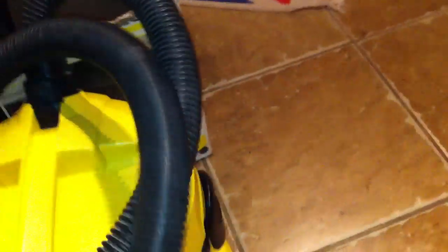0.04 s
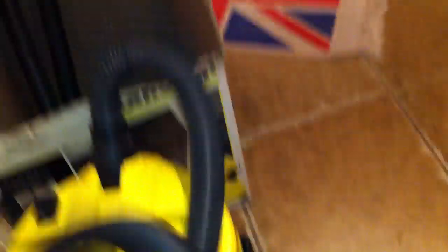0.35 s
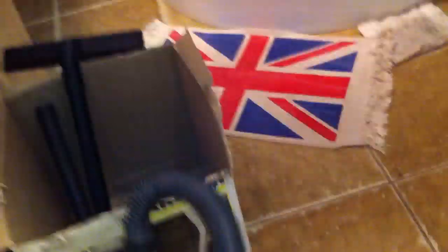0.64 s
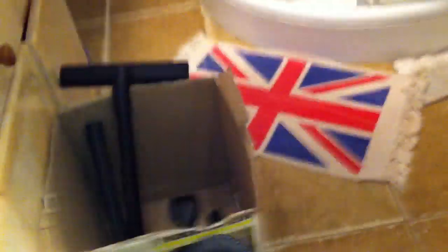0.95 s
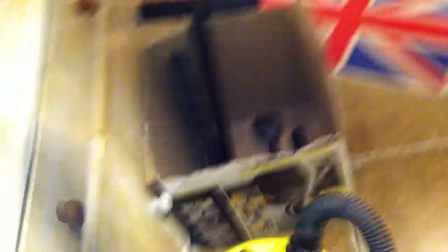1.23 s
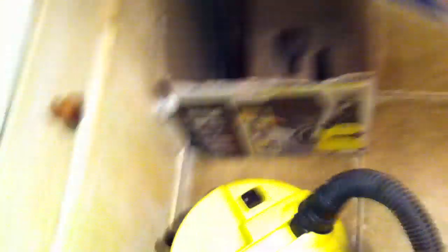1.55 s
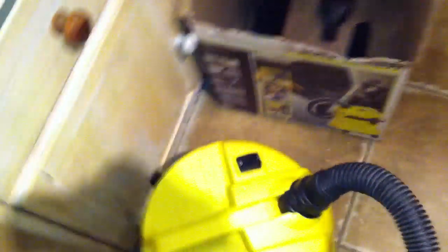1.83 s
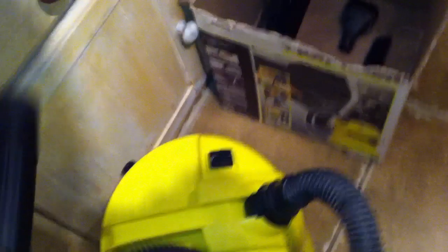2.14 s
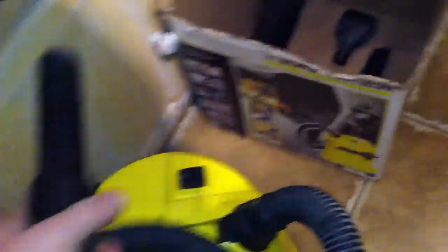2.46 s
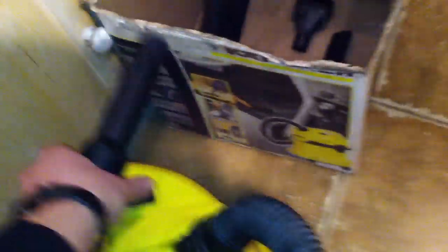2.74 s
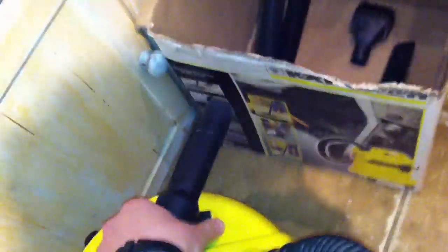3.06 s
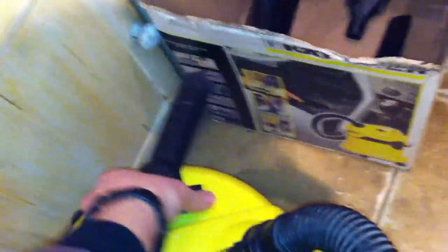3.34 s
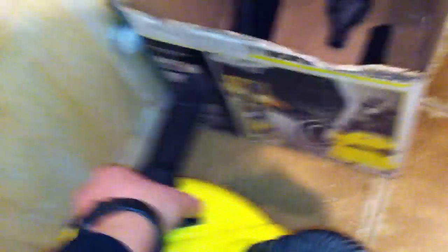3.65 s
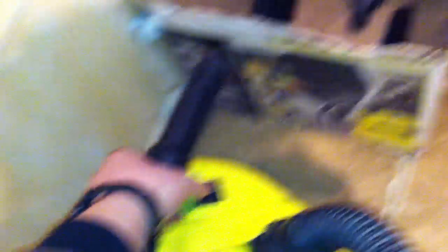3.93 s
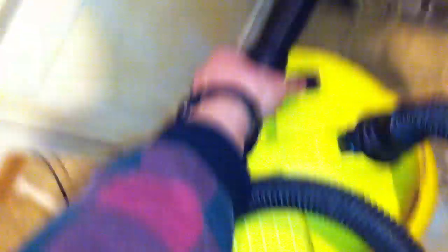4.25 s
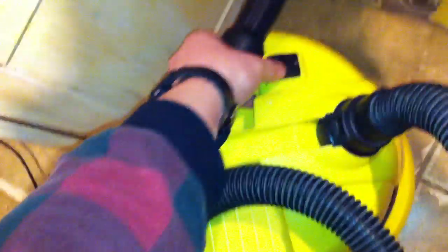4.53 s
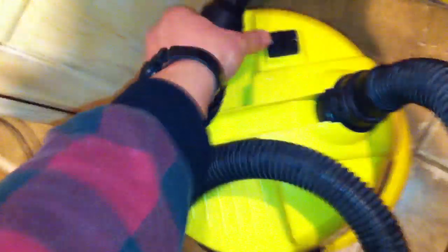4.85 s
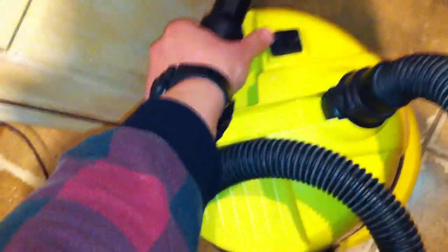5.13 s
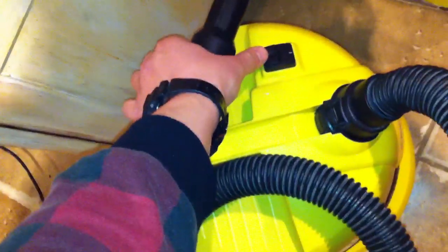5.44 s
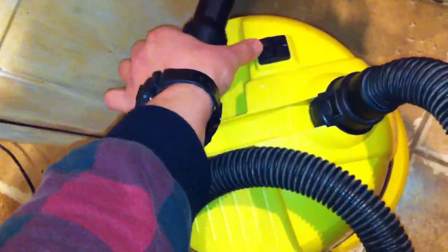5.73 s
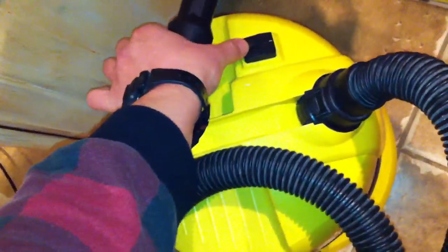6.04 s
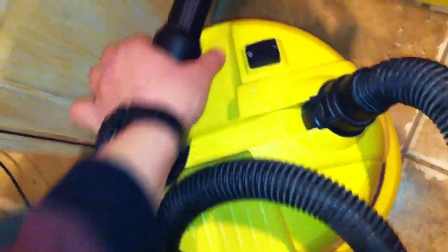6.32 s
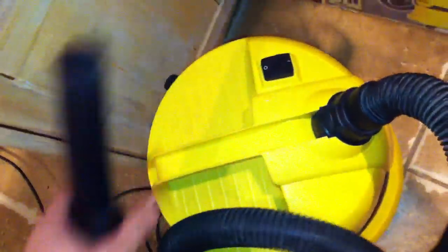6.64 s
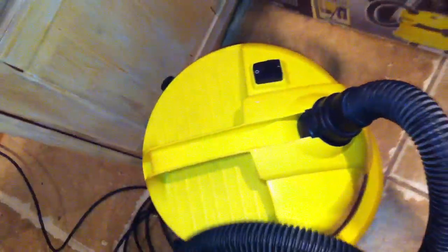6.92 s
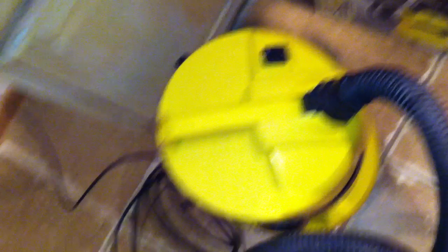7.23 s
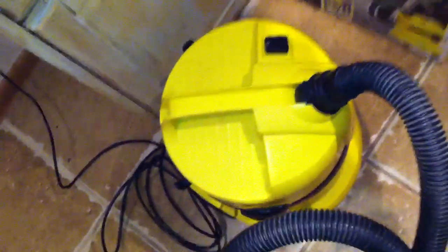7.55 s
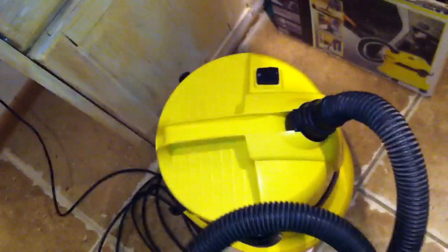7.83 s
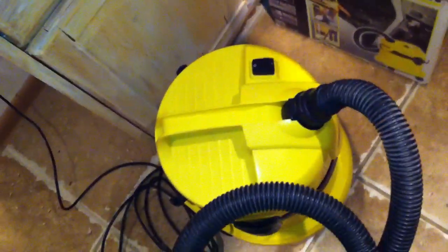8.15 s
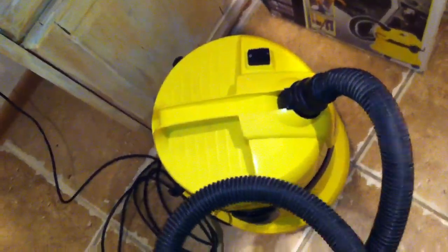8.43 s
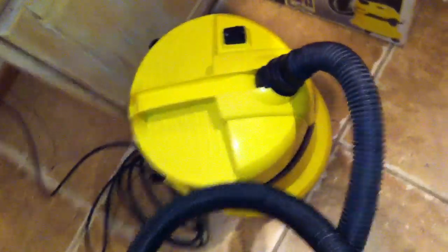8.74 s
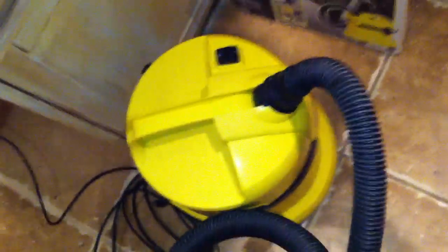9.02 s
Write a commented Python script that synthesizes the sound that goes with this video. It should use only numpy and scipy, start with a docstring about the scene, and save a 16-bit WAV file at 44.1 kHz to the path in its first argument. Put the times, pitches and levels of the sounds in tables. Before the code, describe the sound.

A tub vacuum cleaner is handled close to the microphone in a small tiled room with a short echo. In the first second its ribbed hose and plastic wand make a cluster of hollow knocks and scrapes, strongest around 0.5 seconds. Lighter bumps and faint rubbing follow, then more knocks from about 2.2 to 3 seconds, with a sharp, ringing tap of the wand near 2.8. At 3.6 seconds the switch snaps and the motor starts with a jolt, rising within about half a second to a loud, steady howl with a high whine and rushing, hissing air. At about 6 seconds the power cuts. The pitch glides down, quickly at first and then more slowly, while the hiss fades into a scraping whirr. The tub rumbles and booms as the motor slows, still coasting at the end, around 9 seconds.

```python
"""A small, hard room with a tiled floor, the microphone within a few steps of a tub vacuum cleaner.
Its ribbed hose and plastic wand drag and knock, then the switch clicks. The motor spins up, howls at
its shaft rate with a ball bearing singing beside it, and coasts down when cut.
Air rushes through the fan, the tub rumbles, and the room answers."""
import sys
import numpy as np
from scipy import signal
from scipy.fft import rfft, irfft, next_fast_len
from scipy.io import wavfile
from scipy.ndimage import uniform_filter1d, map_coordinates

SR = 44100
rng = np.random.default_rng(int(sys.argv[2]) if len(sys.argv) > 2 else 0)


def unload_audio(sound):
    """Save the sound as a 16-bit wav file, at the path given as the first command line argument."""
    columns = np.transpose(np.atleast_2d(sound))
    # keep every value between -1 and 1, then stretch to whole-number steps
    steps = np.round(np.clip(columns, -1, 1) * 32767)
    wavfile.write(sys.argv[1], SR, steps.astype(np.int16))


N = 400428

# the room's reverberation: (frequency [Hz], t60 [s])
ROOM_DECAY = [(150, 0.5), (600, 0.51), (2500, 0.43), (8000, 0.36), (16000, 0.051)]
# spectra of the room tone and the handling: (frequency [Hz], relative level [dB])
ROOM_TONE = [(30, -28), (120, -27), (240, 5.5), (350, -4.5), (600, -15), (1100, -9), (2000, -22),
             (5000, -23), (17000, -23)]
HOLLOW_TUB = [(40, -31), (90, -19), (125, -10), (165, -11.5), (250, 4), (300, 2), (345, 2), (400, 0),
              (480, 0), (610, 1), (700, -4), (790, -4.5), (950, -12), (1300, -16), (2500, -72)]
STIFF_PLASTIC = [(500, -36), (1000, 3.5), (1500, 4.5), (2200, 4.5), (3200, -1.5), (5000, -14.5),
                 (8000, -26), (16000, -47)]
BRIGHT_TICK = [(2000, -14), (4000, 0), (5700, -1.5), (8000, -1.5), (10000, -6.5), (14000, -8), (17000, -16)]
CONTACT_PUSH = [(60, -42), (180, -1), (500, 3), (900, 0), (2000, -2), (3500, -8), (6000, -18), (12000, -42)]
SLEEVE_CLOTH = [(1000, -22), (3000, 1), (6000, 2), (9000, 1), (13000, -3), (17000, -2)]
SWITCH_SNAP = [(300, -7), (900, 0), (2500, -1), (4500, -3), (6300, 4), (7300, -4), (8000, -14), (10000, -8),
               (17000, -18)]
# spectra of the machine's noises: (frequency [Hz], relative level [dB])
TUB_RUMBLE = [(25, -26), (70, -44), (125, -36), (165, -23), (205, -3), (245, 6), (285, 0), (390, 1),
              (490, -6), (650, 0), (850, -7), (1300, -9.5), (2500, -60.5)]
TUB_BOOM = [(25, -28), (70, -31), (112, -25.5), (136, -10), (156, 6), (182, -5), (260, -3.5), (600, -91)]
AIR_RUSH = [(150, -35), (300, 1.5), (600, -1.5), (1000, 2), (1500, 3), (2000, 1), (2600, 2), (3300, -1),
            (4500, -15.5), (7000, -26), (12000, -56)]
AIR_HISS = [(2000, -24), (3500, 2), (5300, 0), (6500, -2), (8000, -4), (10000, -7.5), (12500, -8),
            (15000, -7), (17300, -14)]
BRUSH_SCRAPE = [(300, -25.5), (700, -1.5), (1100, -2), (1500, 2.5), (1800, -2.5), (2300, -6), (2900, -9.5),
                (3800, -27), (5000, -30), (9000, -17.5), (15000, -30)]

# a sleeve brushes the hose: (time [s], half length [s], level [dB])
SLEEVE_STROKES = [(.57, .04, -45), (1.41, .04, -53), (1.62, 0.055, -62), (1.977, 0.052, -56),
                  (2.23, .03, -52), (2.515, 0.091, -52), (2.8, 0.026, -51)]
# pulls on the hose: (time [s], rise [s], tub [dB], scrape [dB], swish [dB], boom [dB])
HOSE_PULLS = [(.01, 0.2, -55, -56, -57.5, -70), (0.276, 0.072, -50, -52, -59, -53),
              (0.46, 0.031, -28, -35.5, -41, -28), (0.574, 0.021, -34, -47, -52, -32),
              (0.89, 0.091, -52, -50, -53, -43), (1.12, 0.21, -53, -54.5, -55.5, -54),
              (1.414, 0.064, -41, -48, -55, -41.5), (1.61, 0.076, -51, -54, -57, -43.5),
              (1.953, .12, -63, -64.5, -64, -62), (2.246, 0.067, -58, -55.5, -55, -52),
              (2.558, 0.079, -47.5, -52, -55, -51), (2.73, 0.062, -56, -54, -58, -59),
              (2.87, 0.046, -36, -49, -50.5, -52), (3.064, 0.025, -39, -54, -63, -52),
              (3.543, 0.11, -54, -57.5, -69, -71)]
# the hose's slide after a knock, relative to it: (tub [dB], scrape [dB], swish [dB], boom [dB])
HOSE_SETTLE = [-20.5, -26, -27.5, -33]
# soft nudges on the tub: (time [s], level [dB], mode [Hz])
TUB_BUMPS = [(1.32, -34, 224), (2.254, -34.5, 290), (8.815, -31, 247)]
# plastic contacts: (time [s], level [dB], relative thump [dB], relative tick [dB], favoured mode [Hz])
PLASTIC_KNOCKS = [(0.059, -27.5, -2.5, -16, 760), (0.201, -33, -29, -14, 600),
                  (0.307, -15.5, -5, -18.5, 790), (0.324, -15.5, -21, -17.5, 790),
                  (0.404, -17.5, -8, -22, 600), (0.452, -15, -11, -19, 760), (0.520, -12, -12, -19.5, 450),
                  (0.569, -18, -14, -24, 600), (0.579, -17.5, -30, -16, 300), (0.729, -17.5, -15, -23, 740),
                  (0.947, -18, -14, -23, 620), (1.29, -29, -11, -24, 240), (1.366, -28.5, -2.5, -25, 450),
                  (1.573, -26.5, -17, -8, 744), (1.899, -47, -7, -15, 300), (2.249, -25.5, -14.5, -22, 750),
                  (2.519, -25, -8, -23, 250), (2.602, -31, -3.5, -24, 590), (2.634, -18, -9.5, -22.5, 600),
                  (2.654, -29, -4.5, -24, 600), (3.025, -37, -1, -20, 380), (3.047, -27, -6.5, -19, 790),
                  (3.307, -43.5, -4.5, -27, 600)]
# clicks of cuff, wand and switch: (time [s], level [dB])
CUFF_PINGS = [(0.060, -38.5), (1.574, -38)]
WAND_TAPS = [(2.848, -17), (3.434, -39.5), (3.527, -35)]
SWITCH_CLICKS = [(3.613, -12)]
# modes of the struck parts: (frequency [Hz], level [dB], t60 [s])
CUFF_MODES = [(5600, 1, 0.074), (5720, -2, 0.073), (5860, -1, .06), (6800, -15, .12)]
WAND_MODES = [(1610, -2, 0.21), (1640, -1, .18), (1820, 4.5, 0.16), (2000, -10, .14), (2340, 8, 0.077),
              (2440, -2, .16), (3000, -2, 0.097), (4580, -10, .1), (6850, -22, .08)]
TUB_RING = [(245, -3, 0.41), (296, -7, 0.3), (369, -4, 0.18), (475, -2, 0.14), (587, 4.5, 0.1),
            (642, 0.5, 0.16), (740, -4.5, 0.15), (791, -2.5, 0.19)]

# resonances that the motor drives: (frequency [Hz], level [dB], t60 [s], polarity [+/-1])
CORNER_MODES = [(240.3, -3.5, .56, 1), (248.1, 3.8, .31, 1), (249.5, -.2, .11, -1), (263.1, -3.3, .15, 1),
                (267.1, -5.6, .34, -1), (315.8, -8.2, .37, -1), (343.8, -7.1, .3, -1), (362, -9, .19, -1),
                (382, -4.6, .13, -1), (422, -17, .06, -1), (498, -11, .22, 1), (521.6, -14.5, .34, 1),
                (536.2, -16.2, .37, 1), (568.2, -5.8, .09, 1)]  # standing waves in the corner where the machine stands
HOUSING_MODES = [(1190, 0.5, 0.29, 1), (1451, 5, 0.24, 1), (1527.5, 5.5, 0.41, 1)]
VENT_MODES = [(5300, 2, .007, 1), (6250, 0, .005, 1)]
SHELL_MODES = [(1500, 9, .035, 1), (1855, 7, .04, 1), (2060, 4, 0.035, 1), (2700, -5, 0.023, 1),
               (3260, -5, .02, 1), (4220, -6, .02, 1)]
# speeds at which the tub shakes: (shaft rate [Hz], width [octaves], rumble [dB], boom [dB])
CRITICAL_SPEEDS = [(378, 0.19, -18.5, -52), (221, 0.13, -21.5, -63), (185, 0.12, -23.5, -32.5),
                   (154.6, 0.28, -25.5, -34)]
# fan tones: (order [cycles per shaft turn], level [dB])
FAN_TONES = [(3, -41), (6, -33), (7, -39), (8, -43), (10, -41.5), (15, -50)]
# bearing tones: (shaft order [cycles per turn], cage order [cycles per turn], level [dB])
BEARING_LOW = [(1, -1, -15), (2, -3, -22), (2, -2, -14), (1, 1, -23), (3, -4, -21), (2, -1, 0),
               (3, -3, -14), (2, 1, -12), (4, -4, -20)]
BEARING_HIGH = [(3, -2, -3), (3, -1, -16), (4, -3, 0), (5, -5, -15), (4, -2, -17), (6, -7, -16),
                (5, -4, -13), (4, -1, -14), (6, -6, -15), (6, -5, -18), (8, -9, -15), (7, -6, -12)]
# slow rise and fall of the machine's noise: (time [s], level [dB])
NOISE_SWELL = [(3.6, 1), (4.3, 0), (4.6, 2), (5.2, -0.25), (5.95, -0.5), (6.35, 3.5), (6.7, 6.5), (7.05, 5),
               (7.5, 4), (8.1, 0.9), (8.4, -3.5), (9.08, -3)]
# tones swell and fade as the microphone moves through standing waves: (time [s], level [dB])
OCTAVE_SWELL = [(3.7, -15), (3.88, 3), (4.14, -18), (4.3, -2), (4.46, 3), (4.8, 4), (4.98, 4.5), (5.1, -7),
                (5.3, -3), (6.25, -3), (6.5, 0), (6.7, 1.5), (7.0, -3)]
BEARING_SWELL = [(3.9, -1), (4.12, 2), (4.24, 2), (4.33, -10), (4.48, -7), (4.6, -1), (4.8, -4), (5.1, 2),
                 (5.3, 1), (5.47, 3.5), (5.75, 1), (5.95, 1.5)]
BLADE_SWELL = [(3.75, -4), (3.9, -14), (4.25, -8), (4.58, 4), (5.02, 4), (5.15, -1), (5.55, -2), (5.72, 2),
               (5.95, 1), (6.12, 0), (6.31, -2.5), (6.39, -18)]

ON_S, OFF_S, FULL_HZ = 3.62, 5.965, 544.6  # current on, current cut, full shaft rate
CAGE_RATIO = .3797  # turns of the bearing cage per turn of the shaft
BLADE_ORDER, COMMUTATOR_BARS = 14, 20
TIME, HIT_TIME = np.arange(N) / SR, np.arange(SR // 2) / SR  # seconds into the scene, into one hit


def amp(db):
    """Decibels to gain."""
    return 10 ** (np.asarray(db) / 20)


def unit(x):
    """Scale to rms 1."""
    return x / np.sqrt(np.mean(x ** 2) + 1e-20)


def along(points, hz):
    """Read (Hz, value) points on a log frequency axis."""
    f, v = np.transpose(points)
    return np.interp(np.log(hz + 1), np.log(f + 1), v)


def since(s):
    """Seconds since time s, zero before it."""
    return np.maximum(TIME - s, 0)


def onset(s, rise_s):
    """Exponential rise from 0 to 1, starting at time s."""
    return 1 - np.exp(-since(s) / rise_s)


def swell(points):
    """Gain per sample from (s, dB) points."""
    return amp(np.interp(TIME, *np.transpose(points)))


def wobble(rate):
    """A smooth random curve, rate knots a second."""
    return map_coordinates(rng.standard_normal(int(N * rate / SR) + 4), [TIME * rate])


def colour(x, spectrum):
    """Causal filter with the given spectrum; white noise keeps its power."""
    m = 2 * next_fast_len(len(x) // 2 + 4096)
    gain = unit(amp(along(spectrum, np.fft.rfftfreq(m, 1 / SR))))
    cepstrum = irfft(np.log(np.maximum(gain, 1e-6)))
    cepstrum[1:m // 2] *= 2  # fold to minimum phase
    cepstrum[m // 2 + 1:] = 0
    return irfft(rfft(x, m) * np.exp(rfft(cepstrum)))[:len(x)]


def noise(spectrum, grain_db, rate):
    """Coloured noise of rms 1 whose strength flutters rate times a second."""
    return unit(colour(rng.standard_normal(N) * amp(grain_db * 2 * np.tanh(wobble(rate) / 2)), spectrum))


def burst(spectrum, t60):
    """Coloured noise that falls 60 dB in t60 seconds."""
    return colour(rng.standard_normal(len(HIT_TIME)) * amp(-60 * HIT_TIME / t60), spectrum)


def struck(modes):
    """Modes ringing down from random phases, at peak 1."""
    ring = sum(amp(db - 60 * HIT_TIME / t60) * np.sin(2 * np.pi * (hz * HIT_TIME + rng.random()))
               for hz, db, t60 in modes)
    return ring / np.abs(ring).max()


def resonate(x, modes):
    """The answer of a set of modes to x."""
    m = next_fast_len(N + SR)
    f = np.fft.rfftfreq(m, 1 / SR)
    answer = 0
    for hz, db, t60, polarity in modes:
        damping = 1j * f * np.log(1000) / np.pi / t60
        answer += polarity * amp(db) * damping / (hz ** 2 - f ** 2 + damping)
    return irfft(rfft(x, m) * answer, m)[:N]


def add(track, s, sound):
    """Mix a sound in at time s."""
    part = track[round(s * SR):][:len(sound)]
    part += sound[:len(part)]


def room_tone():
    """The still room: a faint, low noise under everything."""
    return amp(-61) * unit(colour(rng.standard_normal(N), ROOM_TONE))


def echo(x):
    """The tiled room's diffuse answer, as strong as the sound itself."""
    hz, t, bands = signal.stft(rng.standard_normal(SR // 2), SR, nperseg=256)
    tail = signal.istft(bands * amp(-60 * t / along(ROOM_DECAY, hz)[:, None]), SR, nperseg=256)[1]
    tail = np.pad(tail, (130, 0))  # reaches the microphone 3 ms behind the direct sound
    return signal.fftconvolve(x, tail / np.linalg.norm(tail))[:len(x)]


def sleeve():
    """Cloth slides over the hose in short, soft strokes."""
    strokes = sum(amp(db) * np.exp(-.5 * ((TIME - s) / half) ** 2) for s, half, db in SLEEVE_STROKES)
    return strokes * noise(SLEEVE_CLOTH, grain_db=2, rate=200)


def hose(fall_over_rise=1.19, settle_s=.08):
    """The hose's ribs rasp over the tub in small slips, during each pull and after each knock."""
    power = 0
    for s, rise_s, *levels in HOSE_PULLS:
        width_s = np.where(TIME < s, rise_s, rise_s * fall_over_rise)
        pull = 1 / np.cosh(np.minimum(np.abs(TIME - s) / width_s, 20))
        power += np.outer(amp(levels), pull) ** 2
    settling = sum((amp(db) * (TIME > s) * np.exp(-since(s) / settle_s)) ** 2
                   for s, db, *_ in PLASTIC_KNOCKS)
    tub, scrape, swish, boom = np.sqrt(power + np.outer(amp(HOSE_SETTLE) ** 2, settling))
    return (tub * noise(HOLLOW_TUB, grain_db=2, rate=50)
            + scrape * noise(STIFF_PLASTIC, grain_db=1, rate=120)
            + swish * noise(BRIGHT_TICK, grain_db=1, rate=240)
            + boom * noise(TUB_BOOM, grain_db=1.5, rate=11.9))


def cuff():
    """The hose's hard cuff clicks in its socket with a short, bright ping."""
    out = np.zeros(N)
    for s, db in CUFF_PINGS:
        ping = amp(db) * struck(CUFF_MODES)
        add(out, s, ping + amp(-1) * echo(ping))
    return out


def bumps(rise_s=.022):
    """A soft push swells one mode of the tub without a click."""
    out, rise = np.zeros(N), HIT_TIME / rise_s
    for s, db, hz in TUB_BUMPS:
        add(out, s, amp(db) * rise * np.exp(1 - rise) * np.sin(2 * np.pi * hz * HIT_TIME))
    return out


def wand():
    """A hard tap cracks and rings the wand's tube; light taps ring with hardly any crack."""
    out = np.zeros(N)
    hardest_db = max(db for s, db in WAND_TAPS)
    for s, db in WAND_TAPS:
        force = amp(db - hardest_db)
        grip = amp(-350 * (3 - force) * HIT_TIME)  # the hand damps light taps fastest
        ring = amp(-1.5) * grip * struck(WAND_MODES)
        crack = amp(-13) * burst(STIFF_PLASTIC, t60=.15)
        tick = amp(-14.5) * burst(BRIGHT_TICK, t60=.061)
        hit = ring + force * (crack + tick)
        add(out, s, amp(db) * (hit + amp(-4) * echo(hit)))
    return out


def knocks(favour_db=8, favour_octaves=.22, scatter_db=2):
    """Each contact thumps the tub, rings the modes that its spot favours and cracks the stiff plastic."""
    out = np.zeros(N)
    push = colour(signal.unit_impulse(len(HIT_TIME)), CONTACT_PUSH)
    push /= np.abs(push).max()
    for s, db, thump_db, tick_db, spot_hz in PLASTIC_KNOCKS:
        ring = 0
        for hz, mode_db, t60 in TUB_RING:
            lift_db = favour_db * np.exp(-(np.log2(hz / spot_hz) / favour_octaves) ** 2)
            decay = amp(mode_db + lift_db + rng.normal(0, scatter_db) - 60 * HIT_TIME / t60)
            ring += decay * np.sin(2 * np.pi * hz * HIT_TIME) * rng.choice([-1, 1])
        thump = amp(thump_db) * (amp(-3.5) * burst(HOLLOW_TUB, t60=.097) + amp(-14.5) * ring)
        crack = amp(-16.5) * burst(STIFF_PLASTIC, t60=.043)
        tick = amp(tick_db + 2) * burst(BRIGHT_TICK, t60=.033)
        hit = amp(db) * (amp(-7.5) * push + thump + crack + tick)
        add(out, s, hit + amp(-.5) * echo(hit))
    return out


def switch():
    """The rocker's spring gives one dry, bright snap."""
    out = np.zeros(N)
    for s, db in SWITCH_CLICKS:
        snap = amp(db - 8.5) * burst(SWITCH_SNAP, t60=.039)
        add(out, s, snap + amp(-6) * echo(snap))
    return out


def shaft_speed(kick=.29, rise_s=.155, drag_s=.72, friction_per_s=.012):
    """Turns a second: the motor leaps up to speed; unpowered, air drag and friction brake it."""
    spin_up = 1 - (1 - kick) * np.exp(-since(ON_S) / rise_s)
    coast = 1 / (1 + since(OFF_S) / drag_s) - friction_per_s * since(OFF_S)
    return FULL_HZ * spin_up * coast * (1 + .00043 * wobble(7))


def drive(speed, db, exponent):
    """Gain of a machine noise: it comes up with the current and falls as the shaft slows."""
    slowing = np.where(TIME > OFF_S, speed / FULL_HZ, 1) ** exponent
    return amp(db) * onset(ON_S, rise_s=.087) * slowing * swell(NOISE_SWELL)


def shaking(speed, attack_s=.047, hold_s=.26, release_s=.13):
    """The tub rumbles and booms: a jolt of starting torque, a little all along, more at critical speeds."""
    attack = np.minimum(since(ON_S) / attack_s, 1) ** 2
    jolt = np.exp(-since(ON_S + hold_s) / release_s)
    rumble_power = (amp(-16.5) * jolt) ** 2 + drive(speed, db=-34.5, exponent=.2) ** 2
    boom_power = (amp(-43) * jolt) ** 2 + drive(speed, db=-49.5, exponent=.023) ** 2
    for hz, octaves, rumble_db, boom_db in CRITICAL_SPEEDS:
        near = np.exp(-(np.log2(speed / hz) / octaves) ** 2)
        rumble_power += amp(rumble_db) ** 2 * near
        boom_power += amp(boom_db) ** 2 * near
    rumble = np.sqrt(rumble_power) * noise(TUB_RUMBLE, grain_db=1.4, rate=44)
    boom = np.sqrt(boom_power) * noise(TUB_BOOM, grain_db=1.5, rate=11)
    return attack * (rumble + boom)


def brushes(speed):
    """The brushes scrape and tick once a turn; below full speed the commutator's bars ring the shell."""
    turns = np.cumsum(speed) / SR
    scrape = noise(BRUSH_SCRAPE, grain_db=1.5, rate=70) * (1 + .14 * np.sin(2 * np.pi * turns))
    ticks = unit(colour(np.diff(np.floor(turns), prepend=0), BRUSH_SCRAPE))
    bars = np.sin(2 * np.pi * COMMUTATOR_BARS * turns + 1.3 * wobble(260))  # uneven bars blur the pitch
    whirr = amp(-23) * unit(resonate(bars, SHELL_MODES))
    whirr += amp(-17) * unit(resonate(rng.standard_normal(N), SHELL_MODES))  # scraping rings it too
    pace = speed / FULL_HZ
    slow_running = (1 - pace) * (echo(ticks) + whirr + 2 * echo(whirr))
    return drive(speed, db=-28.5, exponent=.72) * (scrape + amp(-5) * pace * ticks + slow_running)


def airflow(speed, surge_db=6, surge_s=.57):
    """Turbulent air in fan and exhaust, strongest while the motor accelerates."""
    surge = amp(surge_db * np.exp(-(since(ON_S) / surge_s) ** 2))
    cut = amp(-5 * onset(OFF_S, rise_s=.1))  # the hiss drops when the current is cut
    rush = drive(speed, db=-22.5, exponent=1.32) * noise(AIR_RUSH, grain_db=1.4, rate=70)
    hiss = drive(speed, db=-22, exponent=1.204) * noise(AIR_HISS, grain_db=.62, rate=130)
    return surge * rush + cut * hiss


def tone(phase, waver_db):
    """A sine of rms near 1 that wavers in phase and level."""
    wave = np.sqrt(2) * np.sin(phase + 2 * np.pi * rng.random() + .17 * wobble(25))
    return wave * amp(waver_db * wobble(3.56))


def fan(angle, pace):
    """The fan's tones flicker in the air stream; its blade whistle, blurred by turbulence, rings the vents."""
    tones = sum(amp(db + 2 * wobble(22)) * tone(order * angle, waver_db=1.2) for order, db in FAN_TONES)
    whistle_gain = amp(-44 + 1.5 * wobble(9)) * swell(BLADE_SWELL) * pace
    whistle = whistle_gain * np.sqrt(2) * np.sin(BLADE_ORDER * angle + .75 * wobble(110))
    return pace ** 6 * tones + whistle + resonate(whistle, VENT_MODES)


def bearing(angle, pace):
    """The ball bearing's cage turns slower than the shaft and sets tones between its orders."""
    def song(lines):
        return sum(amp(db) * tone((shaft + cage * CAGE_RATIO) * angle, waver_db=2 if db < -10 else .7)
                   for shaft, cage, db in lines)
    lower = amp(-14.5) * onset(ON_S, rise_s=1) * song(BEARING_LOW)
    upper = amp(-23.5) * swell(BEARING_SWELL) * song(BEARING_HIGH)
    return pace ** 6.9 * (lower + upper + resonate(upper, HOUSING_MODES))


def howl(angle, pace, speed, balanced_hz=192, direct_db=-22):
    """The rotor's unbalance reaches the microphone directly and through the corner's standing waves."""
    fundamental = tone(angle, waver_db=.77)
    octave = amp(-7) * swell(OCTAVE_SWELL) * tone(2 * angle, waver_db=1)
    unbalance = pace / (1 + (balanced_hz / speed) ** 11) * (fundamental + octave)
    return amp(direct_db) * unbalance + resonate(unbalance, CORNER_MODES)


def motor(speed, steep_hz_per_s=600, beat_rate=85):
    """Howl, fan and bearing follow the shaft; in a glide the pitch held by the room beats with the new one."""
    angle = 2 * np.pi * np.cumsum(speed) / SR
    pace = speed / FULL_HZ * onset(ON_S, rise_s=.022)
    rotor = howl(angle, pace, speed)
    whine = fan(angle, pace) + bearing(angle, pace)
    off_speed = np.tanh(8 * (1 - speed / FULL_HZ))
    glide_hz_per_s = np.abs(np.gradient(uniform_filter1d(speed, size=2001))) * SR
    depth = .75 * np.sqrt(np.minimum(glide_hz_per_s / steep_hz_per_s, 1)) * off_speed
    beats = (1 + depth * np.tanh(1.5 * wobble(beat_rate))) / np.sqrt(1 + depth ** 2 / 2)
    return beats * (rotor + whine) + off_speed * echo(amp(-10) * rotor + amp(-3) * whine)


def scene():
    """Handling, then the running machine, over the still room, all at one microphone."""
    still = room_tone()
    handling = knocks() + cuff() + wand() + bumps() + hose() + sleeve() + switch()
    speed = shaft_speed()
    machine = motor(speed) + brushes(speed) + airflow(speed) + shaking(speed)
    return (still + handling + machine)[None]


def record(dry):
    """The microphone rounds the highest peaks, thins the lowest bass and cuts off at its band limit."""
    bass_hz, top_hz = 65, 17450
    rounded = dry / (1 + np.abs(dry) ** 16) ** (1 / 16)
    m = next_fast_len(N + SR // 2)
    hz = np.fft.rfftfreq(m, 1 / SR)
    response = hz / np.hypot(hz, bass_hz) * (hz < top_hz)
    return irfft(rfft(rounded, m) * response, m)[..., :N]


dry = scene()
out = record(dry)
unload_audio(out)
```